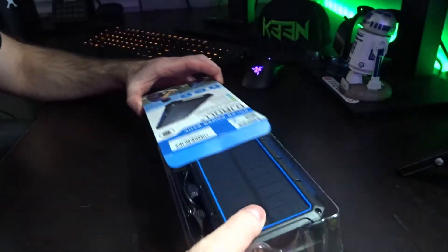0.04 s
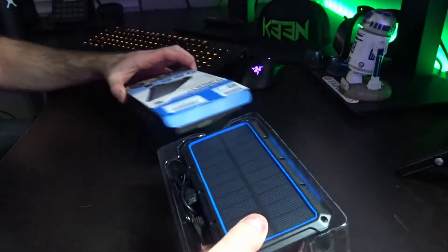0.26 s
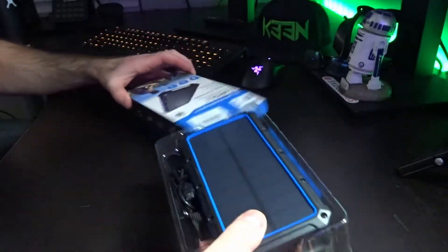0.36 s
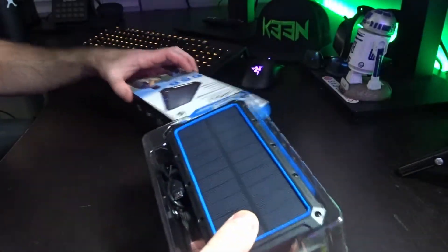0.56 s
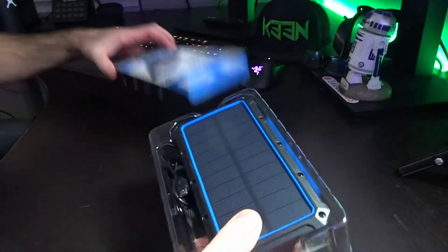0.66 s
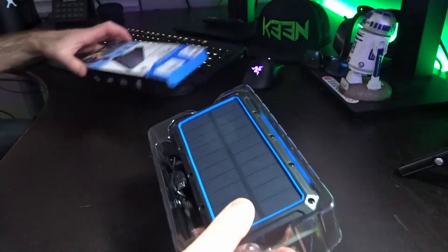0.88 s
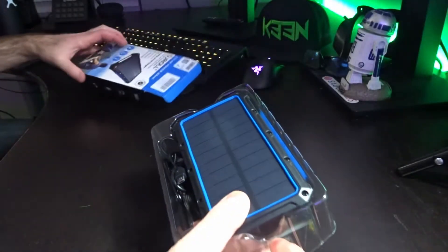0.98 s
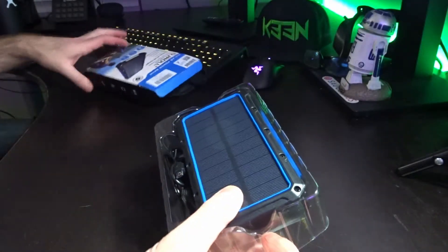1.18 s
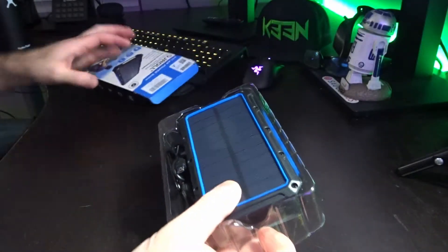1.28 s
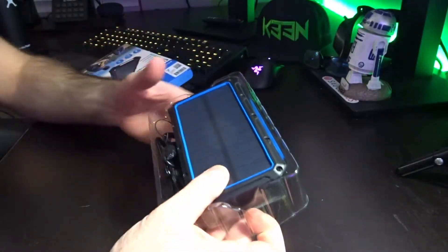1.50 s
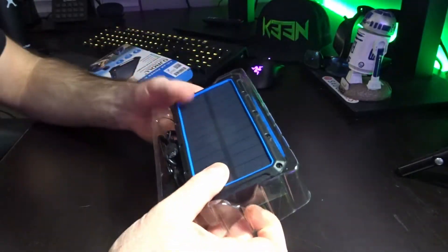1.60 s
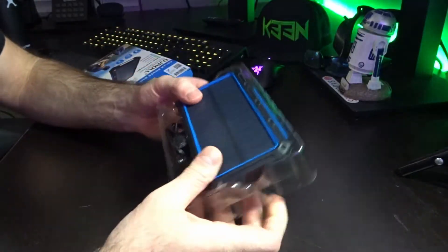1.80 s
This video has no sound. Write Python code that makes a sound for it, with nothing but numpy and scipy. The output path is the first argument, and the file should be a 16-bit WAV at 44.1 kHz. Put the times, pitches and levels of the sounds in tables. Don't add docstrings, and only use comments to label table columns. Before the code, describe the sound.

Close, dry scraping of card on plastic comes in uneven strokes with pops, then buckling plastic clicks and soft knocks on a desk, before settling into quiet fan air and low hum in a small room.

```python
import sys
import numpy as np
from scipy import signal
from scipy.fft import rfft, irfft, next_fast_len
from scipy.io import wavfile
from scipy.ndimage import uniform_filter1d, map_coordinates

SR = 44100
rng = np.random.default_rng(int(sys.argv[2]) if len(sys.argv) > 2 else 0)


def wrap_up_sound(samples):
    columns = np.atleast_2d(samples).T
    tamed = np.clip(columns, -1, 1)
    steps = np.round(tamed * 32767).astype(np.int16)
    wavfile.write(sys.argv[1], SR, steps)


def invert_db(x):
    u = np.asarray(x, float) / 20
    return 10 ** u


N = 81585


def unit(x):
    return x / np.sqrt(np.mean(x ** 2) + 1e-20)


def shape(points):
    point_hz, point_db = np.transpose(points)
    return lambda hz: invert_db(np.interp(np.log(hz + 1), np.log(point_hz + 1), point_db))


def modes(peaks, widen=1):
    def response(f):
        total = 0
        for k, (hz, width_hz, db) in enumerate(peaks):
            damping = 1j * f * width_hz * widen
            total = total + (-1) ** k * invert_db(db) * damping / (hz * hz - f * f + damping)
        return total
    return response


def filtered(x, response):
    size = next_fast_len(x.shape[-1] + 8192)
    spectrum = rfft(x, size) * response(np.fft.rfftfreq(size, 1 / SR))
    return irfft(spectrum, size)[..., :x.shape[-1]]


def wobble(rate_hz):
    knots = rng.standard_normal(int(N * rate_hz / SR) + 4)
    return map_coordinates(knots, [np.arange(N) * rate_hz / SR])


def slips():
    slips_per_s, scatter_db, clump_db, rubbing = 3500, 3.5, 0.6, 0.8
    hit = rng.random(N) < slips_per_s / SR
    sizes = hit * invert_db(scatter_db * rng.standard_normal(N)) * rng.choice([-1, 1], N)
    clumps = invert_db(clump_db * (wobble(70.1) + wobble(220)))
    return (unit(sizes) + rubbing * rng.standard_normal(N)) * clumps


def driven(force, response, level_db):
    return filtered(force * invert_db(level_db), response) / np.std(filtered(force, response))


# (time [s], level [dB])
STROKE_PRESSURE = [
    [(0, -36), (.06, -40), (.13, -39.5), (.18, -37.5), (.23, -39.5), (.285, -38)],
    [(.286, -37), (.298, -27), (.306, -18.5), (.342, -24.5), (.356, -28.5), (.42, -46), (.43, -29.5),
     (.45, -34), (.519, -32)],
    [(.519, -32), (.521, -9.5), (.536, -23.5), (.545, -19), (.565, -16.5), (.58, -18), (.59, -21),
     (.605, -19), (.625, -20.5)],
    [(.62, -19), (.635, -16), (.655, -16), (.69, -18), (.7, -24.5), (.76, -32.5), (.81, -39), (.863, -46)],
    [(.861, -36), (.867, -20), (.92, -19), (.96, -17.5), (.99, -15), (1.022, -17.5), (1.03, -23),
     (1.05, -26)],
    [(1.03, -28), (1.05, -24), (1.08, -24), (1.12, -27), (1.17, -28), (1.2, -27.5), (1.25, -31),
     (1.262, -26)],
    [(1.26, -27), (1.3, -24.5), (1.35, -25.5), (1.4, -32), (1.43, -35.5), (1.47, -39.5), (1.58, -54),
     (1.66, -57), (1.71, -62)],
]
# (pitch [Hz], width [Hz], level [dB])
WALL_MODES = [
    [(885, 82, 8), (2200, 160, 23.5), (3300, 150, -4), (6040, 550, 6)],
    [(620, 29, -10.5), (1000, 66, 2.5), (1398, 30, -2), (1920, 130, 2), (2240, 33, -13)],
    [(856, 30, 4.5), (1500, 57, 8.5), (2380, 30, -10), (2900, 33, 1)],
    [(767, 55, -1.5), (1190, 21, 6.5), (1340, 130, -2.5), (1990, 160, 0.5), (2300, 52, -14)],
    [(993, 30, -5), (1286, 58, 5.5), (1900, 340, -9), (2460, 70, 6.5), (3570, 430, -14.5)],
    [(1200, 130, -1), (1900, 270, 11.5), (2500, 120, 8), (2900, 150, 10.5), (4390, 67, 3)],
    [(900, 29, -4), (1633, 64, 8.5), (2240, 130, 6.5), (2580, 430, 4.5), (4050, 53, -29)],
]
# (fizz [dB], hollow [dB], walls over scrape [dB], fizz gain [dB per dB of pressure])
STROKE_BALANCE = [(-5.5, -10, -2.5, 0.2), (-20, -14, 5.5, -0.7), (-16, -11, -1.5, -0.67),
                  (-16, -21, 1.5, -0.1), (-12.5, -17.5, 3, -0.03), (-9.5, -10.5, 3, 0.05),
                  (-9.5, -7.5, 3, 0.2)]
# (pitch [Hz], width [Hz], level [dB])
SLEEVE_AIR = [(207, 110, -8.5), (288, 90, -1.5), (380, 87, 0), (452.4, 66, 1)]
# (frequency [Hz], density [dB per Hz])
SCRAPE_SPECTRUM = [(250, -50), (500, -2), (900, 2), (1500, -2.5), (2500, 3), (3400, -12), (4500, -16.5),
                   (7000, -51)]
# (frequency [Hz], density [dB per Hz])
FIZZ_SPECTRUM = [(1800, -80), (3500, 3.5), (5000, -0.5), (7000, -3.5), (9000, -8), (12000, -15.5),
                 (15000, -17.5), (16000, -36)]


def strokes():
    out, t = np.zeros(N), np.arange(N) / SR
    wall_band = modes([(1550, 4500, 0)])
    air_band = modes([(353, 370, 0)])
    for rows, balance, peaks in zip(STROKE_PRESSURE, STROKE_BALANCE, WALL_MODES):
        fizz_db, hollow_db, wall_db, fizz_growth = balance
        s, db = np.transpose(rows)
        level_db = np.interp(t, s, db, -140, -140)
        force = slips()
        wall_modes = modes(peaks, 1.7)
        air_modes = modes(SLEEVE_AIR, 1.6)
        out += driven(force, shape(SCRAPE_SPECTRUM), level_db - wall_db / 2)
        out += driven(force, lambda f: wall_modes(f) * wall_band(f) ** 2, level_db + wall_db / 2)
        out += driven(force, lambda f: air_modes(f) * air_band(f) ** 2, level_db + hollow_db)
        growth_db = fizz_growth * (level_db > -99) * (level_db - db.max())
        out += driven(force + slips(), shape(FIZZ_SPECTRUM), level_db + fizz_db + growth_db)
    return out


# (frequency [Hz], rms level [dB])
HUM_LINES = [(59.2, -52.5), (118.4, -59), (646, -64), (1497, -64), (2557, -70)]
# (frequency [Hz], density [dB per Hz])
AIR_SPECTRUM = [(15, -53), (25, -33), (36, -19), (63, -23.5), (87, -2.5), (285, -2.5), (317, -5.5),
                (800, -12.5), (16000, -41.5)]


def background():
    t = np.arange(N) / SR
    hum = np.zeros(N)
    for hz, db in HUM_LINES:
        level_db = db + 1.1 * wobble(2.7) + hz / 600 * wobble(25)
        phase = 0.37 * wobble(2.5) + hz / 2500 * wobble(40)
        hum += np.sqrt(2) * invert_db(level_db) * np.sin(2 * np.pi * hz * t + phase)
    air_db = -49 + 1.8 * wobble(21.16)
    return invert_db(air_db) * unit(filtered(rng.standard_normal(N), shape(AIR_SPECTRUM))) + hum


# (time [s], peak [dB], pitch [Hz],
# crack over it [dB], t60 [s])
WALL_SNAPS = [(.008, -29, 2400, 7.5, 0.047), (.036, -32, 970, -18, .03), (.083, -25, 1500, -20, 0.035),
              (.169, -29.5, 2400, -9, .03), (.2012, -11, 2840, -4, 0.032), (.2381, -17.5, 3000, 4.5, 0.025),
              (.247, -22.5, 2900, -20, 0.044), (.388, -12.5, 2300, -5, 0.041),
              (.397, -20, 1200, -18, 0.022), (.432, -16, 1900, -6, 0.048), (.4382, -11.5, 3560, 0, 0.022),
              (.4936, -8, 2180, 0, 0.037), (.7932, -21.5, 1410, -24, .03), (1.128, -7.5, 1500, -24, 0.031),
              (1.184, -5.5, 3700, 2.5, 0.031), (1.265, -12, 2630, -34, 0.071), (1.2775, -9, 2200, -5, .03),
              (1.2905, -3.5, 1900, -19, 0.026), (1.312, -11, 2400, -30, 0.1),
              (1.3208, -2.5, 2900, -3.5, 0.038), (1.37, -18.5, 2000, -8, 0.036),
              (1.386, -8, 3050, 0.5, 0.057), (1.4365, -20.5, 2800, -19, 0.031),
              (1.437, -16.5, 800, -25, 0.041), (1.637, -42, 1000, -24, .03),
              (1.7228, -26, 1960, -48, 0.018),
              (0.294, -18, 1800, -10, .02), (.301, -11, 1630, -18, 0.027), (0.306, -10, 2200, -19, 0.028),
             (0.3139, -10.5, 1770, -28, .04), (0.3332, -4, 1690, -29, 0.017),
             (0.3371, -9, 1690, -27, 0.028), (.52, -5.5, 2500, -14, .04), (.538, -1, 2300, -12, 0.024),
             (.5505, -1.5, 1000, -24, 0.035), (0.554, -10, 1500, -20, 0.017), (0.56, -6.5, 3000, -3, 0.016),
             (.569, -10, 1780, 0, 0.013), (.575, -3, 2270, -2.5, 0.048), (0.6034, -12.5, 4230, 8.5, 0.021),
             (.629, -7, 1380, -20, .03), (.634, -11, 2340, -20, 0.04), (.643, -13, 3500, 2, 0.025),
             (.651, -11.5, 1290, -25, 0.044), (.669, -9, 1000, -22, .03), (.685, -11, 1500, -15, 0.019),
             (.704, -14, 2300, -13, 0.033), (.866, -7.5, 1420, -13, 0.023), (.871, -6.5, 2300, -7, 0.035),
             (0.896, -5.5, 2780, -4, 0.011), (.901, -9, 2970, 3.5, .02), (.953, -12, 2300, -15, 0.024),
             (.969, -11.5, 1100, -20, 0.016), (0.978, -10, 1270, -19, .02), (.993, -7, 1200, -20, .04),
             (1.008, -4, 2090, -8, 0.022), (1.015, -3.5, 2360, -26, 0.02), (1.019, -11.5, 1410, -15, 0.051)]


def snaps():
    rise_s, crack_t60_s, wall_q = 0.00028, 0.016, 1.2
    strike = 5
    dull = 2.32
    noise_db, broad_db = -9, -2
    out, t = np.zeros(N + SR), np.arange(SR // 10) / SR
    first_break = strike * (np.arange(len(t)) == 4)

    def decay(t60_s):
        return invert_db(-60 * t / t60_s) * (1 - np.exp(-t / rise_s))

    for s, db, hz, crack_db, t60_s in WALL_SNAPS:
        rattle, rub, bright = rng.standard_normal((3, len(t)))
        wall = modes([(hz, hz / wall_q, 0)])
        ring = filtered(rattle * decay(t60_s) + first_break,
                        lambda f: wall(f) ** 2 / (1 + 1j * f / (dull * hz)) ** 3)
        broad = invert_db(broad_db) * unit(filtered(rub, shape(SCRAPE_SPECTRUM))) * decay(t60_s)
        crack = invert_db(crack_db) * unit(filtered(bright, shape(FIZZ_SPECTRUM))) * decay(crack_t60_s)
        snap = ring / np.abs(ring).max() + invert_db(noise_db) * (broad + crack)
        out[round(s * SR):][:len(t)] += invert_db(db) * snap
    return out[:N]


# (time [s], peak [dB], pitch [Hz], t60 [s])
CONTACTS = [(0.081, -29, 349, 0.047), (.12, -40.5, 114.7, 0.55), (.203, -16, 895, 0.038),
            (0.249, -37.5, 119, 0.52), (.335, -24.5, 620, 0.3), (.655, -15.5, 487, 0.23),
            (.7, -19, 1340, 0.3), (.925, -21.5, 436.4, 0.59), (.97, -15.5, 1037, 0.21),
            (1.058, -32, 170, 0.18), (1.129, -22, 397, 0.091), (1.257, -25, 388, 0.11),
            (1.32, -14.5, 380, 0.058), (1.323, -30.5, 113, 0.19), (1.44, -23.5, 417, 0.095),
            (1.44, -33, 121, 0.16), (1.47, -33, 693, 0.31)]


def thumps():
    rise_cycles, waver_rad = 1.22, 1.07
    s, db, hz, t60_s = np.transpose(CONTACTS)[:, :, None]
    t = np.maximum(np.arange(N) / SR - s, 0)
    waver = waver_rad * np.array([wobble(70) for _ in CONTACTS])
    swell = 1 - np.exp(-t * hz / rise_cycles)
    return (np.sin(2 * np.pi * hz * t + waver) * invert_db(db - 60 * t / t60_s) * swell).sum(0)


# (frequency [Hz], t60 [s])
ROOM_T60 = [(200, 0.5), (1500, 0.22), (10000, 0.23)]


def room(x):
    hz, t, noise = signal.stft(rng.standard_normal(SR // 2), SR, nperseg=128)
    t60_hz, t60_s = np.transpose(ROOM_T60)
    fade = invert_db(-60 * t / np.interp(hz, t60_hz, t60_s)[:, None])
    tail = signal.istft(noise * fade, SR, nperseg=128)[1]
    return signal.fftconvolve(x, tail / np.linalg.norm(tail))[:N]


def gain_control(near):
    threshold_db, slope, window_s = -24.5, 0.7, 0.058
    power = np.abs(uniform_filter1d(near ** 2, int(window_s * SR)))
    loud_db = 10 * np.log10(power + 1e-12)
    return invert_db(-slope * np.maximum(loud_db - threshold_db, 0))


# (frequency [Hz], side over mid [dB])
WIDTH = [(60, -55), (250, -34), (550, -16.5), (1650, -14), (5000, -3.5), (8000, 0.5), (15000, -3)]


def side_of(mid):
    z = signal.stft(mid, nperseg=256)[2]
    turn = np.exp(2j * np.pi * rng.random(z.shape))
    unlike = np.sqrt(2) * signal.istft(z * turn, nperseg=256)[1][:N]
    return filtered(unlike, shape(WIDTH))


def scene():
    near = strokes() + snaps() + thumps()
    near = near + invert_db(-14) * room(near)
    mid = near + gain_control(near) * background()
    side = side_of(mid)
    return np.array([mid + side, mid - side])


def top_cut(x):
    return signal.sosfilt(signal.butter(12, 16650, fs=SR, output="sos"), x)


def record(dry):
    ceiling, top_hz = 0.95, 15600
    soft = dry / (1 + np.abs(dry / ceiling) ** 6) ** (1 / 6)
    mix = filtered(soft, lambda hz: np.clip((top_hz + 500 - hz) / 700, 0, 1) ** 2)
    return top_cut(mix)


dry = scene()
out = record(dry)
wrap_up_sound(out)
```